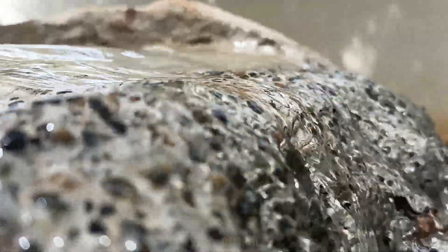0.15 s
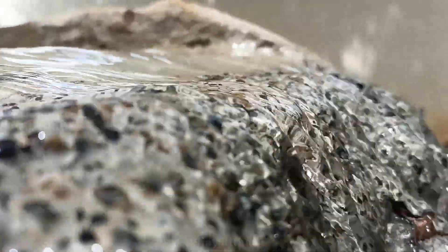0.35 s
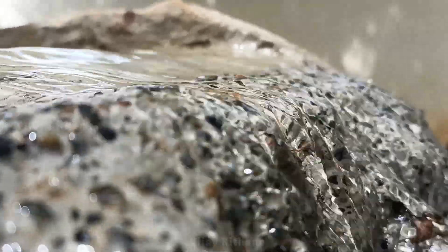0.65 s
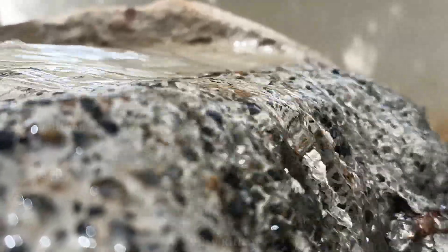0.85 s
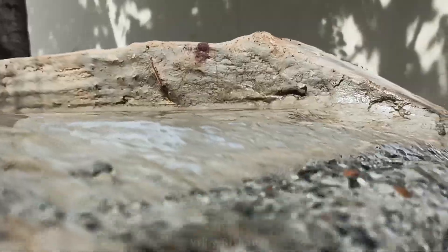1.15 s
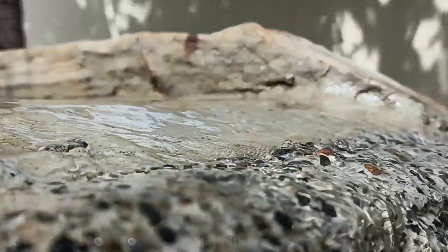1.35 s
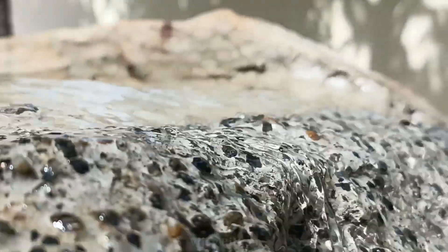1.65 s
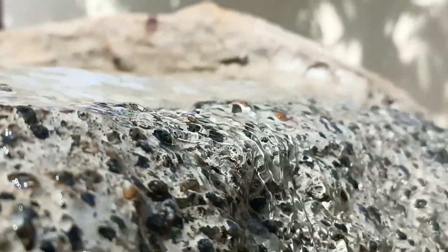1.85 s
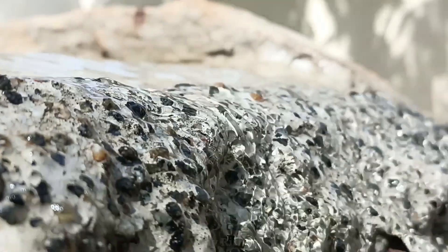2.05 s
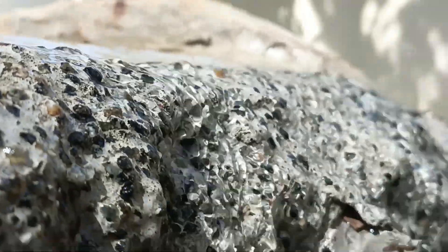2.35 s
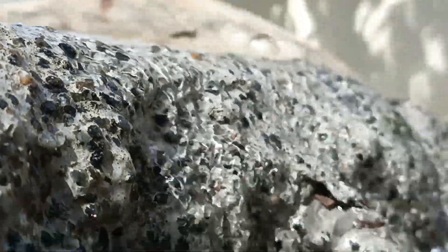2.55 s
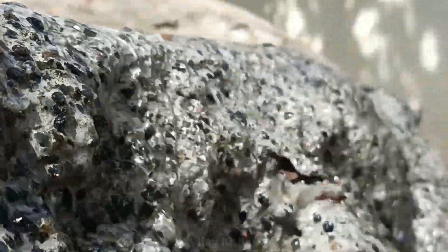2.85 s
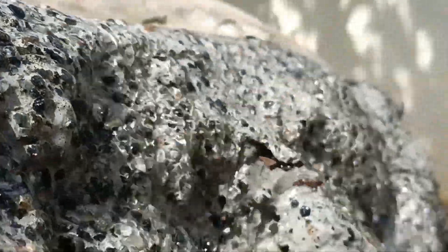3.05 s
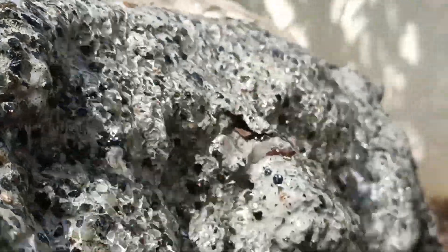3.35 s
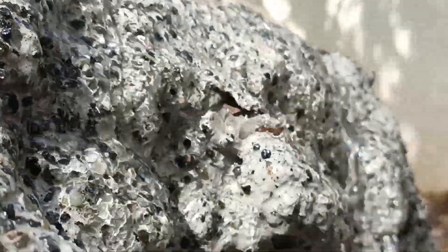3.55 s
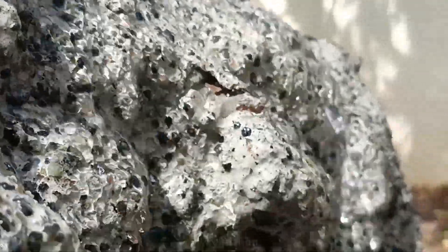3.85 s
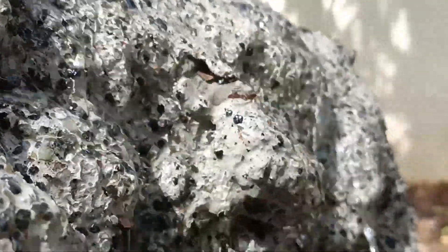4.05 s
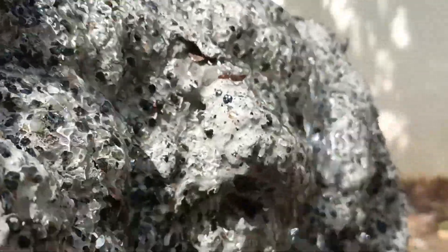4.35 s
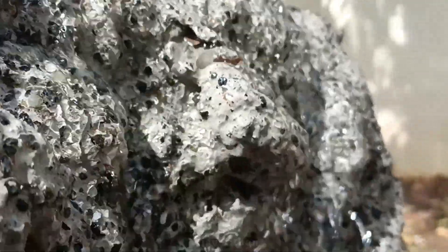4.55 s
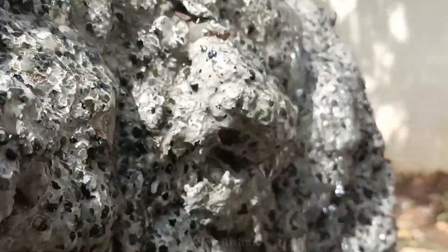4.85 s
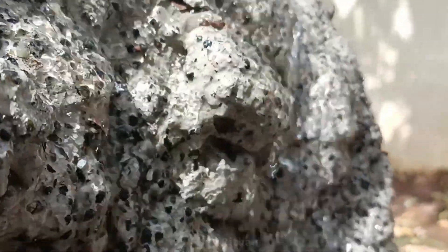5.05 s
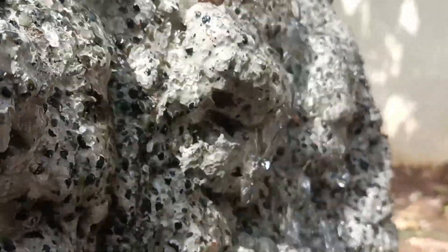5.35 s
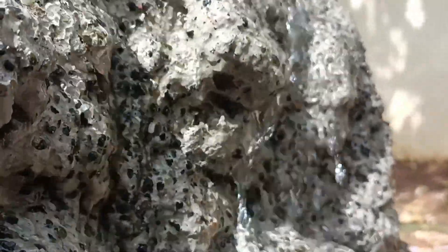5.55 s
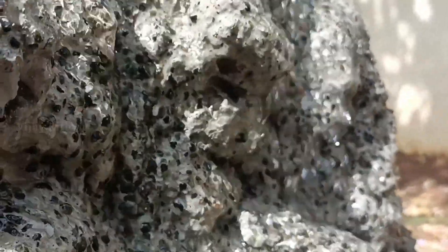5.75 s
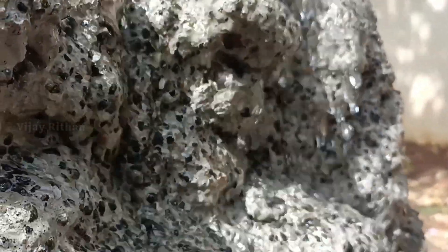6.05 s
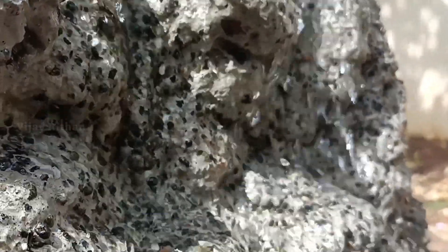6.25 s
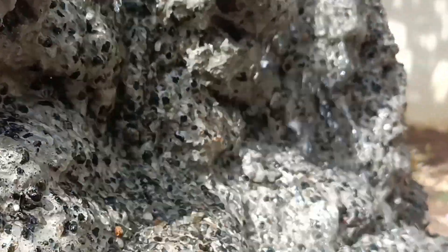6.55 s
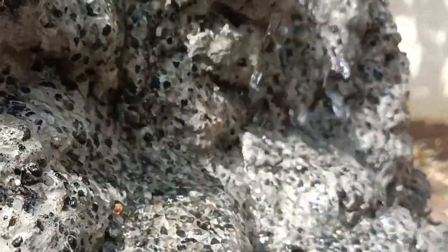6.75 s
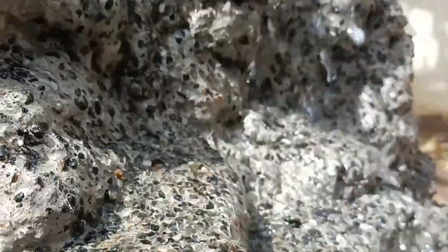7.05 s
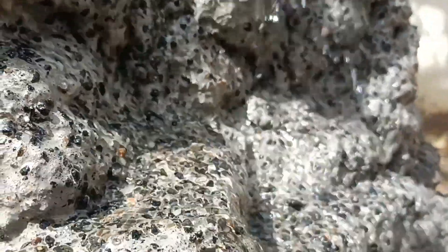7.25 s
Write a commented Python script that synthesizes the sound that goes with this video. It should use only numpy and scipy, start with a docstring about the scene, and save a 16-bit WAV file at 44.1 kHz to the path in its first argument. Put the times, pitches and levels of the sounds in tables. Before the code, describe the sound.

From 0 s, a small trickle over rough wet concrete is heard very close, in dry stereo. Sharp bright drop ticks and very short ringing bubbles, many rising in pitch, come densely and irregularly, leaning left, over crackling splashes and spurts of high fizz. A hollow babbles softly at far left, with dull knocks around 0.13 and 0.2 s. Prominent plinks continue around 1.1, 1.4 and 2.2 s. Soft deep thuds near 1.7, 2.1 and 2.55 s accompany a wavering low rumble, swelling from about 1.9 s and cut off at 2.67 s. The trickle then turns thinner and more distant: sparser ticks, weaker bubbles, fine spray. Separate murmuring gulps at differing pitches sound on the left, with brisk splats near 3.6 s and 3.8 s. Around 6.9-7.05 s a faint thin note arches up and slightly down; light drips continue to about 7.4 s over quiet garden air.

```python
"""Water trickles over a small concrete garden waterfall, heard from very close. From the start drops tick on
wet stone and trap bubbles that ring, many rising in pitch, over fizz in spurts (noise, random ticks and tiny
rings); a hollow babbles on the left (coloured noise). From about 1.7 s soft thuds and a low rumble (noise plus
wavering tones) swell; the rumble stops at 2.67 s, where the scene changes. From there the trickle sounds
thinner, the hollow gulps at separate pitches, and a thin note (sine) arches near 6.9 s."""
import sys
import numpy as np
from scipy import signal
from scipy.fft import rfft, irfft
from scipy.io import wavfile
from scipy.ndimage import uniform_filter1d

SR = 44100
rng = np.random.default_rng(int(sys.argv[2]) if len(sys.argv) > 2 else 0)


def master(y):
    """Save y as 16-bit WAV."""
    cut = np.clip(np.atleast_2d(y).T, -1, 1)
    pcm = np.round(cut * 32767)  # scale
    wavfile.write(sys.argv[1], SR, pcm.astype(np.int16))


N = 326340  # samples, 7.4 s

# Pan is the left/right ratio in dB, positive to the left. Spectra are relative: [f/Hz, level/dB].
# Spectrum of the quiet garden air: [f/Hz, level/dB]
AIR_SPECTRUM = [(20, -20.5), (55, 2), (110, -0.5), (250, 1), (600, -7), (2000, -2), (16000, -42)]
# Spectrum of the rumble noise: [f/Hz, level/dB]
RUMBLE_SPECTRUM = [(20, -16.5), (55, -5.5), (85, -6.5), (120, -3.5), (150, -3.5), (185, -7.5), (300, -17),
                   (500, -28)]
# Course of the low rumble: [t/s, level/dB]
RUMBLE_LEVELS = [(0, -84), (.3, -77), (.7, -80.5), (.9, -83.5), (1.75, -84.5), (1.92, -69), (2.2, -65.5),
                 (2.25, -82), (2.31, -63), (2.645, -58), (2.675, -100)]
# Tones in the rumble, relative to its course: [f/Hz, level/dB]
HUM_TONES = [(108, -2.5), (127, -3), (167, -12)]
# Soft low thuds: [t of the middle/s, peak level/dB]
LOW_THUDS = [(1.69, -71), (2.1, -65), (2.56, -68.5)]
# Faint arching note: [t/s, f/Hz, level/dB]
WHISTLE_NOTE = [(6.88, 2040, -85), (6.895, 2120, -66), (6.94, 2260, -70), (7.0, 2340, -66),
                (7.06, 2270, -70)]
# Spectrum of the hollow in full flow: [f/Hz, level/dB]
FULL_GURGLE_SPECTRUM = [(250, -17.5), (420, -20), (530, -0.5), (760, 7), (1100, -2.5), (1400, -8.5),
                        (1900, -34.5)]
# Spectrum of the hollow in thin flow: [f/Hz, level/dB]
IDLE_GURGLE_SPECTRUM = [(300, -23), (560, -4), (720, 6), (830, 14), (1100, -5.5), (1350, 6.5), (1900, -26)]
# Gulps of the half-empty hollow: [t/s, length/s, level/dB, f/Hz]
HOLLOW_GULPS = [(2.766, 0.08, -58.5, 816), (3.035, 0.15, -61.5, 832), (3.259, 0.2, -58.5, 880),
                (3.655, 0.33, -57, 844), (4.211, 0.49, -61, 866), (4.355, 0.13, -68.5, 1130),
                (4.684, 0.18, -70, 520), (4.884, 0.32, -59.5, 844), (4.968, 0.24, -60.5, 1080),
                (5.36, 0.13, -57, 818), (5.611, 0.18, -63, 754), (5.824, 0.337, -65, 824),
                (6.578, 0.17, -62.5, 855), (6.584, 0.18, -67, 1110), (6.827, 0.11, -63.5, 747),
                (7.027, 0.029, -58.5, 913), (7.267, 0.21, -63.5, 866)]
# Spectrum of the fine spray: [f/Hz, level/dB]
SPRAY_SPECTRUM = [(5000, -21), (6800, -2), (9500, -3), (11000, -16.5), (12000, -7), (15500, -18.5)]
# Spectrum of water breaking on stone: [f/Hz, level/dB]
SPLASH_SPECTRUM = [(400, -40.5), (1100, 1), (1500, 1.5), (2200, -12), (3300, 8), (5200, 5), (6300, -4),
                   (7500, -21.5)]
# Slugs of water slapping onto stone: [t/s, length/s, splashing level/dB, fine spray level/dB]
SLAPS = [(0, 0.069, -61.5, -72), (0.194, 0.15, -59, -57), (0.445, 0.15, -66, -56.5),
         (0.705, 0.043, -51, -57), (0.824, 0.028, -51.5, -77), (0.97, 0.058, -62.5, -56),
         (1.124, 0.088, -61.5, -56), (1.312, 0.039, -58, -63), (1.538, 0.08, -70, -53),
         (1.764, 0.12, -62, -56.5), (1.856, 0.048, -59, -71), (1.931, 0.06, -51.5, -85),
         (2.074, 0.097, -61, -57.5), (2.225, 0.085, -60.5, -58), (2.353, 0.12, -59, -79),
         (2.497, 0.13, -58, -73), (2.746, 0.077, -53.5, -49.5), (2.847, 0.071, -68, -52),
         (3.089, 0.034, -70.5, -51), (3.133, 0.11, -62.5, -48.5), (3.292, 0.034, -67, -50.5),
         (3.394, 0.017, -62.5, -57.5), (3.565, 0.041, -52, -57), (3.636, 0.018, -46, -44),
         (3.699, 0.16, -61, -64), (3.944, 0.037, -57.5, -52.5), (4.086, 0.025, -83, -49),
         (4.176, 0.022, -62.5, -66.5), (4.274, 0.0053, -48.5, -68), (4.34, 0.16, -74.5, -57.5),
         (4.568, 0.11, -66, -77), (4.833, 0.013, -83.5, -57.5), (4.945, 0.019, -51, -49),
         (5.01, 0.035, -65, -52.5), (5.136, 0.064, -59.5, -50.5), (5.278, 0.028, -77, -68),
         (5.322, 0.018, -68.5, -80), (5.376, 0.037, -83, -66), (5.428, 0.1, -64.5, -57.5),
         (5.594, 0.022, -65.5, -56), (5.667, 0.16, -69, -57), (5.86, 0.05, -73, -61),
         (5.958, 0.04, -59.5, -60.5), (6.062, 0.017, -49.5, -51), (6.178, 0.12, -71.5, -56.5),
         (6.379, 0.012, -79, -48), (6.518, 0.022, -81, -59), (6.611, 0.067, -72.5, -55.5),
         (6.752, 0.041, -65, -52), (6.955, 0.13, -85.5, -88.5), (7.157, 0.055, -65.5, -58.5),
         (7.358, 0.051, -56, -58)]
# Heavy drops knocking in the hollow: [t/s, level/dB]
HOLLOW_KNOCKS = [(0.1335, -20.5), (0.1998, -29.5), (2.3664, -27.5), (3.621, -20.5), (3.8111, -25)]
# Drops striking stone: [t/s, level/dB, tick f/Hz, pan/dB]
STONE_DROPS = [(0.023, -21, 8200, 32), (0.0592, -23.5, 4670, 8), (.0728, -27, 14200, 25),
               (0.1007, -29, 13900, 22), (0.101, -31, 4460, 11), (0.1233, -27, 12000, 10),
               (0.1344, -13.5, 3460, 6.5), (0.1789, -20.5, 11300, 10), (0.229, -37, 11400, 19),
               (0.2451, -15.5, 5170, 11), (0.2854, -30.5, 7600, 23), (0.3424, -31, 7850, 17),
               (0.4252, -27.5, 9350, 1.5), (0.5147, -24.5, 4600, 31), (0.5322, -27.5, 7900, 22),
               (0.5652, -19.5, 2480, 19), (.724, -26.5, 8900, 19), (0.728, -21, 6270, 9),
               (0.809, -33, 7860, 17), (0.821, -24, 4430, 15), (.928, -33, 14100, 22),
               (.9622, -16.5, 3500, 22), (.9831, -29, 3660, 21), (0.996, -24, 6700, 27),
               (1.035, -16.5, 5650, 14), (1.1121, -15, 5000, 13), (1.1391, -21, 3860, 13),
               (1.1736, -25.5, 11600, 18), (1.281, -28, 11200, 28), (1.294, -29.5, 6800, 19),
               (1.3648, -26, 6800, 21), (1.3653, -20.5, 3760, 12), (1.5033, -27.5, 12000, 26),
               (1.543, -31, 9900, 20), (1.615, -26, 7440, 36), (1.6465, -27.5, 6360, 30),
               (1.6844, -16, 5850, 20), (1.738, -30.5, 5100, 9), (1.775, -21, 12200, 17),
               (1.776, -14.5, 4260, 11.5), (1.844, -20.5, 4500, 15), (1.8727, -28, 14100, 19),
               (1.9773, -20, 5470, 8), (1.987, -24, 3930, 5), (2.0885, -18.5, 4910, 7),
               (2.147, -22.5, 15100, 19), (2.1511, -28, 7460, 29), (2.2211, -23, 4300, 23),
               (2.244, -24, 12300, 26), (2.2674, -31, 13500, 18), (2.305, -38, 8900, 15),
               (2.321, -23.5, 11700, 18), (2.3254, -26, 12600, 18), (2.356, -19.5, 6900, 15),
               (2.3672, -21.5, 3980, 6.5), (2.402, -30, 8700, 8), (2.448, -24, 11800, 15),
               (2.5233, -28, 5200, -2), (2.546, -18.5, 6470, 17), (2.621, -22.5, 8000, 15),
               (2.73, -27, 10600, 27), (2.7412, -25, 5260, 10), (2.816, -27.5, 5080, 29),
               (2.9554, -31.5, 8800, -11), (3.038, -32, 5000, 5), (3.09, -35, 6000, -1.5),
               (3.166, -29, 8140, 9), (3.2188, -27.5, 6640, 11.5), (3.2953, -21.5, 10100, 22.5),
               (3.518, -29.5, 8340, 31), (3.6244, -26, 7060, -26), (3.7236, -28.5, 5130, -10.5),
               (3.745, -29.5, 12500, 16), (3.7843, -31, 8300, -1.5), (3.808, -19.5, 8540, 18),
               (3.811, -17.5, 3850, 4.5), (4.042, -28, 12300, 29), (4.163, -29.5, 10030, 11),
               (4.21, -34.5, 8480, -18.5), (4.282, -32.5, 3300, -18), (4.4167, -39, 7060, -12),
               (4.5893, -31.5, 6200, -8.5), (4.648, -35, 8470, 18), (4.709, -38.5, 3750, -21),
               (4.7918, -30, 8870, 24), (5.0584, -30.5, 11500, 13.5), (5.075, -27, 8660, 8),
               (5.1493, -28.5, 6530, 3), (5.1853, -25.5, 11740, 19), (5.1857, -25, 5700, 1),
               (4.989, -32.5, 8800, 4), (5.2897, -36.5, 8760, 22), (5.408, -33, 8700, 28),
               (5.445, -28.5, 6530, 11.5), (5.735, -32.5, 9700, -14), (5.77, -32, 9000, 25),
               (5.794, -36.5, 9460, -22), (5.87, -31.5, 9770, 31), (6.0592, -34.5, 8800, -23),
               (6.073, -43, 3340, 4.5), (6.2213, -24.5, 12800, 27), (6.24, -29, 8400, 16.5),
               (6.5245, -22.5, 11270, 22), (6.5584, -29, 10220, 25), (6.755, -32, 9500, -27),
               (6.7703, -30.5, 9300, 20), (6.8044, -35, 11840, 15.5), (6.9546, -34.5, 11160, 19.5),
               (6.98, -31.5, 10860, 32.5), (7.0112, -34.5, 11600, 25), (7.0373, -18, 8160, 24),
               (7.059, -33, 12500, 31), (7.0918, -23.5, 11860, 39), (7.1651, -29.5, 5630, -15),
               (7.3849, -29.5, 6250, -9.5)]
# Ringing air bubbles: [t/s, level/dB, starting f/Hz, pitch rise as share of f/(1/s), decay/ms, pan/dB];
# a negative rise sounds as a steady pitch
AIR_BUBBLES = [(0.01, -31, 3640, -3, 1.5, 13), (0.1787, -18, 2390, 123, 4.9, 8),
               (0.2188, -28.5, 6450, 0, 0.97, 24), (0.246, -30.5, 2800, 86, 2.8, 28),
               (0.2677, -27, 3730, 0, 1.2, 7), (0.4595, -26, 3210, -5, 1.2, 11),
               (0.482, -22, 6070, 0, 0.39, 9), (0.4926, -27, 5030, 27, 1.6, -0.5),
               (0.5311, -20, 6330, 9, 1.05, 10), (0.569, -18, 2220, 51, 2.4, 6.5),
               (0.6632, -14.5, 2286, 19, 2.7, 7.5), (0.7162, -32.5, 3210, -5, 2.5, 12),
               (0.7272, -28.5, 2930, -3, 3.2, 5), (0.84, -20, 3130, -3, 1, 16), (0.946, -27, 3960, 0, 1, 4),
               (0.962, -14, 2760, -2, 1.77, 5), (0.9762, -32, 3270, -2, 4.8, 9),
               (0.9957, -32.5, 3070, 2, 1.5, 8), (1.0285, -26, 4620, 0, 0.72, 10),
               (1.1021, -13.5, 2117, 61.5, 3.6, 6.5), (1.1525, -29.5, 5800, 2, 0.36, 0.5),
               (1.1609, -31.5, 3160, 0, 1.4, 21), (1.2367, -28.5, 6550, 4, 0.62, 12),
               (1.294, -23, 5270, -6, 1.4, 11), (1.343, -14.5, 2166, 44, 3.2, 5),
               (1.3855, -10, 2167, -4.5, 4.2, 7), (1.4274, -26.5, 6470, -3, 1.4, 13),
               (1.428, -34, 1835, 47, 3.8, -5), (1.4347, -21, 4880, -2, 0.48, 10),
               (1.5031, -18, 4970, -4, 1.1, 14), (1.538, -17, 5130, -4, 0.83, 12),
               (1.6668, -20.5, 4940, -6, 1.4, 7), (1.7555, -23.5, 2380, -1, 2.1, 3.5),
               (1.777, -38, 2400, 12, 3, 2), (1.8199, -38, 3770, 0, 1.9, 20),
               (1.9042, -42, 2930, 0, 2, -10), (1.9171, -42, 2950, -1, 2.5, 1),
               (1.9454, -15.5, 2620, 95, 3.2, 10), (2.084, -28, 3820, -5, 2.1, 11),
               (2.104, -31.5, 4370, 2, 0.61, -15), (2.2212, -10.5, 2530, 18.5, 1.7, 6.5),
               (2.2542, -45, 2240, -3, 3.3, -10), (2.2666, -16, 5120, -5, 0.77, 9.5),
               (2.305, -44, 2400, 5, 3.4, 10), (2.3434, -39, 5300, -1, 2.2, -31),
               (2.3568, -21.5, 3143, 3, 2.9, 8.5), (2.4015, -17.5, 4600, -3, 0.58, 11),
               (2.4264, -26, 5700, -2, 1.1, 11), (2.461, -42, 2970, 0, 2, 14),
               (2.5149, -15.5, 2386, 24, 3.3, 7.5), (2.5501, -11, 2396, 46.5, 2.8, 9),
               (2.571, -31, 3630, 19, 1, 16), (2.5932, -27.5, 3440, 26, 1.6, 28),
               (2.6008, -19.5, 4960, -1, 0.98, 8), (2.6221, -13, 4120, 8, 0.93, 11),
               (2.68, -38, 5480, 3, 2, 4), (2.7303, -19, 6120, -1, 0.64, 10),
               (2.7666, -36, 2930, 13, 4.4, -12), (2.7766, -29.5, 1042, 64.5, 9.5, 1),
               (2.7819, -25.5, 1422, 42, 2.4, -7), (2.8192, -34.5, 3600, -3, 1.2, 1),
               (2.8474, -38.5, 4740, 12, 3.1, -22), (3.0638, -32.5, 1640, 3, 2, -9.5),
               (3.141, -35, 2970, -5, 2.2, 18), (3.245, -25.5, 3600, -1, 1.4, 8.5),
               (3.577, -26.5, 2004, 15, 2.6, -1), (3.5877, -33.5, 3080, 1, 2.1, -16),
               (3.6203, -19, 2450, 65, 2.2, 5), (3.6642, -36, 835, 2, 7.6, 4),
               (3.7419, -37, 1535, 3, 1.9, -8), (3.9754, -35, 6700, 7, 0.78, 1.5),
               (4.006, -37.5, 4650, 33.5, 1.8, 50.5), (4.1434, -41, 5340, 17, 1.06, 4),
               (4.279, -40, 2540, 2.5, 2.2, -27), (4.338, -47, 4840, -2.5, 2.2, -9),
               (4.381, -33.5, 5370, -5.5, 1.1, 11), (4.442, -44.5, 1200, 7, 8.1, 11.5),
               (4.498, -44, 3640, 15, 2.8, 18), (4.624, -46, 1415, 2, 5, -1),
               (4.647, -63, 2400, 3, 1.7, -2.5), (4.697, -51.5, 2920, 10, 3.8, -19),
               (4.708, -48.5, 1796, 13.5, 1.8, 1), (4.9367, -35, 686, 0.5, 10, 10),
               (4.9464, -36.5, 5710, 33.5, 3.7, -10), (4.9665, -31.5, 1296, 73, 1.6, -1),
               (5.1264, -32.5, 1064, 0, 2.1, 0.5), (5.1673, -38, 3680, 9, 1.2, 22),
               (5.2009, -31.5, 4960, 2, 0.51, 10.5), (5.2725, -42, 5040, 21, 1.3, 9),
               (5.3278, -39, 4920, -6, 2.2, 1.5), (5.4385, -36, 774, 8, 3.7, 19),
               (5.4485, -31, 975, 56, 6.4, 5.5), (5.4596, -30, 6130, 45, 0.8, -15),
               (5.4885, -38, 3050, -13.5, 1.3, -19.5), (5.5108, -21, 6100, -2, 0.47, 10.5),
               (5.583, -25, 6430, 18, 1.8, -4), (5.6276, -31.5, 5480, 7.5, 1.3, 0.5),
               (5.712, -47.5, 1275, 0, 4.1, 9), (5.8065, -35.5, 3530, -7, 3, 13),
               (5.8959, -31, 5160, 12, 0.77, -5.5), (6.005, -51, 1600, 8, 4.4, -1),
               (6.0717, -33, 1487, 25.5, 1.3, -0.5), (6.0725, -33, 2280, 2, 1.5, -1),
               (6.085, -38, 2790, 16, 0.83, -37.5), (6.113, -46.5, 780, 3, 2, 25),
               (6.2064, -23.5, 7300, -4, 0.37, 23), (6.2497, -45.5, 3860, 0, 3.6, -19),
               (6.285, -54, 932, 4.5, 9.7, 21), (6.3777, -33.5, 1407, 14.5, 5.6, -18.5),
               (6.3906, -41.5, 1530, 36.5, 7.5, 0.5), (6.4014, -25, 5100, -1, 1.25, 20),
               (6.435, -43.5, 6000, 3, 1.2, 1), (6.4667, -36.5, 5530, 6.5, 0.68, -0.5),
               (6.751, -44, 1156, 11, 3, 12), (6.79, -46, 3230, -2, 4.1, 14.5),
               (6.7946, -27, 3260, -4, 1.24, 12), (7.0822, -33, 5820, 1, 0.84, -3),
               (7.344, -24.5, 6200, 92, 1.76, 19), (7.3728, -42, 853, 0, 2.3, 20),
               (7.3749, -34, 4370, -8, 0.92, 27)]

SCENE_CHANGE_S = 2.67  # the scene changes; the trickle sounds thinner from here
EDGE_HZ = 16100
SIDE_LAG_S = .00041  # greatest lag of the farther channel
HUM_WAVER_PER_S = 20
FULL_GURGLE_DB, IDLE_GURGLE_DB = -56.5, -71.5
GULP_ATTACK_S, GULP_FADE_S, GULP_WIDTH_HZ = 0.0054, 0.025, 142  # width at half amplitude
SPLASH_ATTACK_S, SPLASH_FADE_S, SPRAY_FADE_S = 0.006, 0.014, 0.019
# steady flow under the slaps, before and after the scene change
FILM_DB, THIN_FILM_DB = -72, -79.5
MIST_DB, THIN_MIST_DB = -63.5, -65.5
# parts of a splash, relative to its level
WASH_DB, GRAIN_DB, CRACKLE_DB, PATTER_DB = -5.5, 3, 3, 0
RANDOM_TICK_MS = 0.605  # fine droplets
KNOCK_HZ, KNOCK_MS, KNOCK_PAN_DB = 714, 0.59, 52
TICK_MS = 0.32  # decay of drop and bubble impacts
# droplets scattered by a bubble-trapping drop; level before and after the scene change
SPATTER_DB, FAR_SPATTER_DB = -18, -19.5
SPATTER_WITHIN_S, SPATTER_PITCH_SPAN, SPATTER_MS = 0.014, 0.37, 0.39


def amp(db):
    """Amplitude of a level in dB."""
    return 10 ** (np.asarray(db) / 20)


def evened(x):
    """Scales to rms 1."""
    return x / np.sqrt(np.mean(x ** 2) + 1e-20)


def curve(rows, axis=1):
    """One column of a time table at every sample."""
    rows = np.asarray(rows)
    return np.interp(np.arange(N) / SR, rows[:, 0], rows[:, axis])


def spectrum_gain(points, hz):
    """Gain at the frequencies hz, interpolated in dB over log frequency."""
    f, db = np.transpose(points)
    return amp(np.interp(np.log(hz + 1), np.log(f), db))


def sides(pan_db):
    """Left and right gains of mean power 1."""
    return evened(amp(np.array([[pan_db], [-pan_db]]) / 2))


def across_change(before, after):
    """A value that switches where the scene changes."""
    return curve([(SCENE_CHANGE_S - .01, before), (SCENE_CHANGE_S + 0.0049, after)])


def add(mix, s, sound, pan_db):
    """Places a sound; it reaches the farther channel a little later."""
    lag_s = SIDE_LAG_S * np.tanh(pan_db)
    lates_s = (max(-lag_s, 0), max(lag_s, 0))
    for channel, gain, late_s in zip(mix, sides(pan_db), lates_s):
        start = max(round((s + late_s) * SR), 0)
        part = channel[start:][:len(sound)]
        part += gain * sound[:len(part)]


def surges(rows, steady_db, attack_s, fade_s):
    """Level in dB of a steady flow plus surges (s, length s, dB) that rise, hold and fade; powers add."""
    t = np.arange(N) / SR
    power = amp(steady_db) ** 2 * np.ones(N)
    for s, length_s, db in rows:
        span = slice(*np.searchsorted(t, [s, s + length_s + 10 * fade_s]))
        age_s = t[span] - s
        rise = np.minimum(age_s / attack_s, 1)
        fade = np.exp(-np.maximum(age_s - length_s, 0) / fade_s)
        power[span] += (amp(db) * rise * fade) ** 2
    return 10 * np.log10(power)


def noise(points, patchy_db, patch_s, patch_hz, size=512):
    """Coloured two-channel noise of rms 1, with random patches in time and pitch."""
    hop = size // 4
    real, imag, patches = rng.standard_normal((3, 2, size // 2 + 1, N // hop + 5))
    patch_frames = max(round(patch_s * SR / hop), 1)
    patch_bins = max(round(patch_hz * size / SR), 1)
    patches = uniform_filter1d(patches, patch_frames, 2)
    patches = evened(uniform_filter1d(patches, patch_bins, 1, mode="wrap"))
    cells = (real + 1j * imag) * amp(patchy_db * np.minimum(patches, 2))
    patchy = signal.istft(cells, nperseg=size, noverlap=size - hop)[1][:, :N]
    gain = spectrum_gain(points, np.fft.rfftfreq(N, 1 / SR))
    return evened(irfft(rfft(patchy) * gain, N))


def ring(hz, decay_ms, rise, attack_cycles=0.32):
    """An air pocket pinches off and rings; as it nears the surface its pitch climbs and it dies faster."""
    decay_s = max(decay_ms, .05) / 1000
    t = np.arange(int(7 * decay_s * SR) + 16) / SR
    climb = 1 + max(rise, 0) * t
    attack = 1 - np.exp(-t * hz / attack_cycles)
    swing = attack * np.exp(-np.cumsum(climb) / SR / decay_s)
    phase = 2 * np.pi * np.cumsum(np.minimum(hz * climb, SR / 2)) / SR
    return swing / swing.max() * np.sin(phase)


def burst(decay_ms, low_hz, span=1.86):
    """A tiny spray of droplets: a band of noise that swells and dies at once."""
    age = np.arange(2048) / SR * 1000 / decay_ms  # in decay times
    hiss = rng.standard_normal(len(age)) * 2 * np.sqrt(age) * np.exp(-age)
    edges_hz = np.minimum([low_hz, max(span, 1.2) * low_hz], [SR / 4, .45 * SR])
    return signal.sosfilt(signal.butter(2, edges_hz, "band", fs=SR, output="sos"), hiss)


def swarm(level_db, per_s, low_hz, high_hz, cycles, spread_db, pan_db, attack_cycles, rise_per_cycle):
    """Random small bubbles whose sizes follow a level curve; a few stand out."""
    out = np.zeros((2, N))
    for when, pitch, size, damping, rise, side in rng.random((int(per_s * N / SR), 6)):
        hz = low_hz * (high_hz / low_hz) ** pitch
        db = level_db[int(when * N)] + spread_db * min(-np.log(1 - size), 2.7)
        decay_ms = 1000 * cycles * (.5 + damping) / hz
        sound = ring(hz, decay_ms, rise_per_cycle * hz * rise ** 2, attack_cycles)
        add(out, when * N / SR, amp(db) * sound, pan_db + 24 * (side - .5))
    return out


def ticks(level_db, per_s, low_hz, high_hz, spread_db, pan_db):
    """Random pitchless ticks of fine droplets, whose sizes follow a level curve."""
    out = np.zeros((2, N))
    shapes = [burst(RANDOM_TICK_MS, hz, span=2.2) for hz in np.geomspace(low_hz, high_hz, 40)]
    for when, shape, size, side in rng.random((int(per_s * N / SR), 4)):
        db = level_db[int(when * N)] + spread_db * min(-np.log(1 - size), 2.5)
        sound = shapes[int(shape * len(shapes))]
        add(out, when * N / SR, amp(db) * sound, pan_db + 24 * (side - .5))
    return out


def stone(x, echo_db, t60_s, first_s):
    """Scattered reflections from rough stone: sparse random taps that decay."""
    t = np.arange(SR // 4) / SR
    taps = rng.standard_normal((2, len(t))) * (rng.random((2, len(t))) < .15)
    taps *= (t > first_s) * amp(-60 * t / t60_s)
    taps /= np.linalg.norm(taps, axis=1, keepdims=True) + 1e-12
    crossed = x + .5 * x[::-1]  # each side hears some of the other
    return amp(echo_db) * signal.oaconvolve(crossed, taps, axes=1)[:, :N]


def air(level_db=-76):
    """Quiet garden air: steady coloured noise."""
    return amp(level_db) * noise(AIR_SPECTRUM, patchy_db=1.0, patch_s=0.075, patch_hz=300, size=2048)


def hum():
    """Low tones that waver in pitch and strength."""
    t, out = np.arange(N) / SR, np.zeros(N)
    for hz, db in HUM_TONES:
        drift, swell = (np.interp(t * HUM_WAVER_PER_S, np.arange(N), row)
                        for row in rng.standard_normal((2, N)))
        phase = 2 * np.pi * np.cumsum(hz * (1 + .065 * drift)) / SR
        out += amp(db + 3 * swell) * np.sqrt(2) * np.sin(phase)
    return out


def rumble(noise_db=-5.0):
    """Low noise and humming tones under one level course."""
    low_noise = noise(RUMBLE_SPECTRUM, patchy_db=-1, patch_s=.06, patch_hz=50, size=4096)
    body = amp(noise_db) * low_noise + hum()
    return amp(curve(RUMBLE_LEVELS)) * body * sides(pan_db=-6.5)


def thuds(hz=55, length_s=0.18):
    """Soft thuds: low sines that swell and fade."""
    out = np.zeros((2, N))
    t = np.arange(0, length_s, 1 / SR)
    thud = np.hanning(len(t)) * np.sin(2 * np.pi * hz * t)
    for s, db in LOW_THUDS:
        add(out, s - length_s / 2, amp(db) * thud, 0)
    return out


def whistle():
    """One thin arching note: a gliding sine whose level flutters."""
    t = np.arange(N) / SR
    sounding = (t > WHISTLE_NOTE[0][0]) & (t < WHISTLE_NOTE[-1][0])
    tone = np.sin(2 * np.pi * np.cumsum(curve(WHISTLE_NOTE, axis=1)) / SR)
    flutter = 1.0 + 0.45 * evened(uniform_filter1d(rng.standard_normal(N), size=500))
    return amp(curve(WHISTLE_NOTE, axis=2)) * sounding * flutter * tone


def burble(full_db=-62, thin_db=-71):
    """Larger bubbles that crowd softly through the hollow, each at its own pitch."""
    return swarm(across_change(full_db, thin_db), per_s=40, low_hz=620, high_hz=1250, cycles=7,
                 spread_db=3, pan_db=16, attack_cycles=4, rise_per_cycle=.002)


def gulp(length_s, db, hz):
    """The hollow murmurs at a pitch set by how full it is: noise through a resonance."""
    age_s = np.arange(SR) / SR
    offset = (np.fft.rfftfreq(SR, 1 / SR) - hz) / (GULP_WIDTH_HZ / 2)
    murmur = evened(irfft(rfft(rng.standard_normal(SR)) / (1 + offset ** 2), SR))
    waver_db = 3.5 * np.interp(age_s * 30, np.arange(40), rng.standard_normal(40))
    murmur = evened(murmur * amp(waver_db))
    attack = np.minimum(age_s / GULP_ATTACK_S, 1)
    return amp(db) * murmur * attack * np.exp(-np.maximum(age_s - length_s, 0) / GULP_FADE_S)


def gurgle():
    """Water in a hollow on the left: a broad babble that narrows to wavering gulps after the scene changes."""
    full = noise(FULL_GURGLE_SPECTRUM, patchy_db=5, patch_s=.025, patch_hz=300, size=512)
    idle = noise(IDLE_GURGLE_SPECTRUM, patchy_db=5, patch_s=.04, patch_hz=170, size=1024)
    out = across_change(0.74, 0) * amp(FULL_GURGLE_DB) * full * sides(pan_db=34.0)
    out += across_change(0, 0.92) * amp(IDLE_GURGLE_DB) * idle * sides(pan_db=31)
    for s, length_s, db, hz in HOLLOW_GULPS:
        add(out, s, gulp(length_s, db, hz), pan_db=47)
    return out


def spray(wash_db=-9.0, grain_db=4, thin_grain_db=-4):
    """The finest droplets: fizz, and sharp pinpricks that scatter off the stone."""
    puffs = [(s, length_s, db) for s, length_s, _, db in SLAPS]
    level_db = surges(puffs, across_change(MIST_DB, THIN_MIST_DB), SPLASH_ATTACK_S, SPRAY_FADE_S)
    fizz = noise(SPRAY_SPECTRUM, patchy_db=8, patch_s=.008, patch_hz=6000, size=128) * sides(pan_db=3)
    pricks = ticks(level_db + across_change(grain_db, thin_grain_db), per_s=150, low_hz=4000, high_hz=8600,
                   spread_db=6, pan_db=11)
    scattered = stone(pricks, echo_db=-6.5, t60_s=0.0045, first_s=.0007)
    return amp(level_db + wash_db) * fizz + pricks + scattered


def splashing():
    """Water breaking over the stone: a wash with small bubbles, sharp crackle and a patter of droplets."""
    slaps = [(s, length_s, db) for s, length_s, db, _ in SLAPS]
    level_db = surges(slaps, across_change(FILM_DB, THIN_FILM_DB), SPLASH_ATTACK_S, SPLASH_FADE_S)
    wash = noise(SPLASH_SPECTRUM, patchy_db=7, patch_s=.012, patch_hz=900, size=256) * sides(pan_db=-2)
    small = swarm(level_db + GRAIN_DB + across_change(2, -2), per_s=130, low_hz=2200, high_hz=5600, cycles=8,
                  spread_db=3.5, pan_db=0, attack_cycles=3, rise_per_cycle=.003)
    crackle = ticks(level_db + CRACKLE_DB + across_change(1, -10), per_s=200, low_hz=2500, high_hz=4400,
                    spread_db=4, pan_db=6)
    patter = swarm(level_db + PATTER_DB + across_change(-3, -.5), per_s=380, low_hz=1400, high_hz=5800,
                   cycles=4.5, spread_db=3, pan_db=0, attack_cycles=5, rise_per_cycle=.002)
    return amp(level_db + WASH_DB) * wash + small + crackle + patter


def knocks(splash_db=-17, rebound_db=-19, rebound_within_s=0.049):
    """A heavy drop gives the hollow one dull knock; its fragments fall back with smaller ones."""
    out = np.zeros((2, N))
    for (s, db), fragments in zip(HOLLOW_KNOCKS, rng.random((len(HOLLOW_KNOCKS), 3, 2))):
        add(out, s, amp(db) * ring(KNOCK_HZ, KNOCK_MS, 0), KNOCK_PAN_DB)
        add(out, s, amp(db + splash_db) * burst(decay_ms=1.9, low_hz=KNOCK_HZ), KNOCK_PAN_DB / 2)
        for delay, pitch in fragments:
            fragment = ring(KNOCK_HZ * (.7 + .6 * pitch), decay_ms=0.98, rise=0)
            add(out, s + rebound_within_s * delay, amp(db + rebound_db) * fragment, KNOCK_PAN_DB)
    return out


def drops(spray_db=-15):
    """Each impact is a tick of a few cycles and a short spray."""
    out = np.zeros((2, N))
    for s, db, hz, pan_db in STONE_DROPS:
        add(out, s, amp(db) * ring(hz, TICK_MS, 0, attack_cycles=1.0), pan_db)
        add(out, s, amp(db + spray_db) * burst(decay_ms=0.94, low_hz=hz, span=2.3), pan_db)
    return out


def bubbles(snap_db=-27, tick_db=-20, tick_db_per_ms=-3):
    """The plinks: a snap, the ring, and the ragged splash and spatter of the drop that trapped the air."""
    out = np.zeros((2, N))
    splash_db = across_change(-30, -11)
    attack_cycles = across_change(1.3, 2.7)
    spatter_db = across_change(SPATTER_DB, FAR_SPATTER_DB)
    chances = rng.random((len(AIR_BUBBLES), 8, 3))  # 8 droplets each
    for (s, db, hz, rise, decay_ms, pan_db), droplets in zip(AIR_BUBBLES, chances):
        now = int(s * SR)
        add(out, s, amp(db) * ring(hz, decay_ms, rise, attack_cycles[now]), pan_db)
        add(out, s, amp(db + snap_db) * burst(decay_ms=0.89, low_hz=hz), pan_db)
        # smaller drops: stronger bright tick
        impact_db = db + tick_db + tick_db_per_ms * decay_ms
        add(out, s, amp(impact_db) * burst(TICK_MS, low_hz=5000, span=3.2), pan_db + 4)
        # larger drops: longer, lower splash
        splash = burst(decay_ms=2 * min(decay_ms, 4), low_hz=hz)
        add(out, s, amp(db + splash_db[now]) * splash, pan_db / 2)
        for delay, pitch, size in droplets:
            droplet = ring(hz * (1 + SPATTER_PITCH_SPAN * pitch), SPATTER_MS, 0, attack_cycles=0.99)
            gain = amp(db + spatter_db[now]) * size ** 2
            add(out, s + SPATTER_WITHIN_S * delay, gain * droplet, pan_db)
    return out


def scene():
    """The nearest drips are almost dry; the later ones lie farther off among the rocks."""
    # sources this small radiate hardly any bass
    bass_cut = signal.butter(8, 480, "high", fs=SR, output="sos")
    drips = signal.sosfilt(bass_cut, bubbles() + drops() + knocks())
    near = stone(drips * amp(across_change(-3.4, 0)), echo_db=-12.5, t60_s=0.036, first_s=.0007)
    far = stone(drips * amp(across_change(-7.5, 0)), echo_db=-28.0, t60_s=0.2, first_s=0.0089)
    background = air() + rumble() + thuds() + whistle()
    return background + burble() + gurgle() + spray() + splashing() + drips + near + far


def record(dry):
    """Band limit: a linear-phase low-pass at EDGE_HZ."""
    lowpass = signal.firwin(255, EDGE_HZ, window=("kaiser", 8), fs=SR)
    return signal.oaconvolve(dry, lowpass[None], "same", axes=1)


dry = scene()
out = record(dry)
master(out)
```